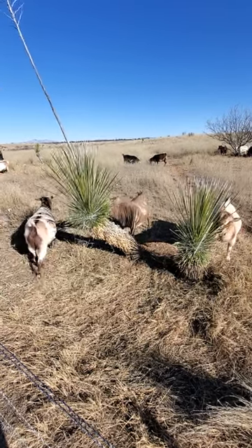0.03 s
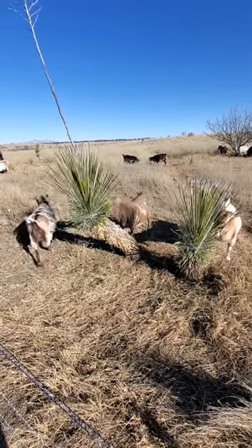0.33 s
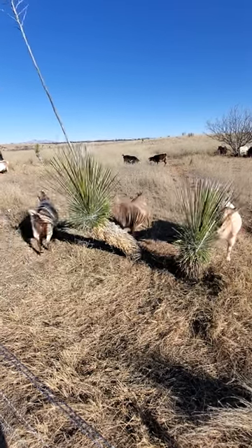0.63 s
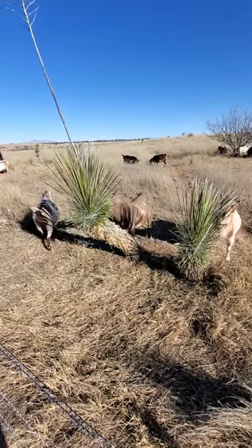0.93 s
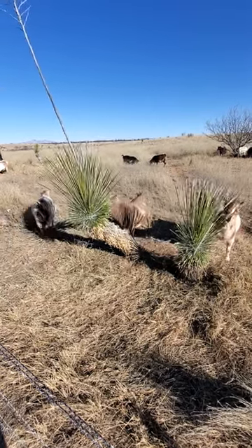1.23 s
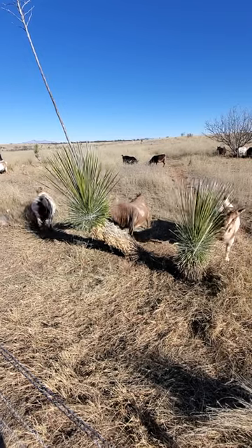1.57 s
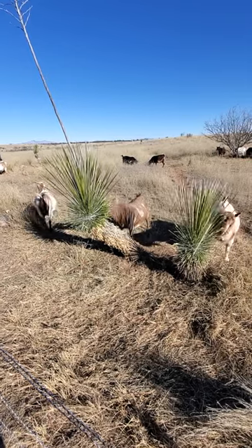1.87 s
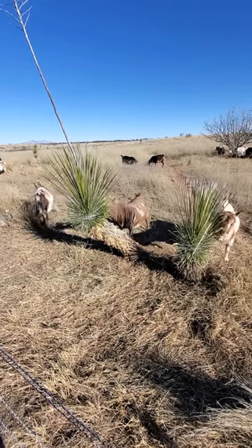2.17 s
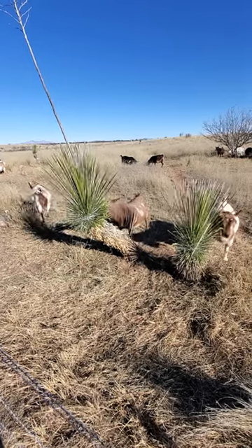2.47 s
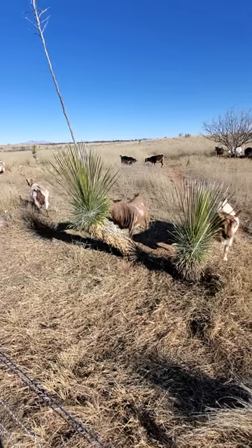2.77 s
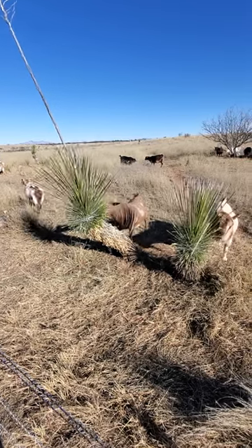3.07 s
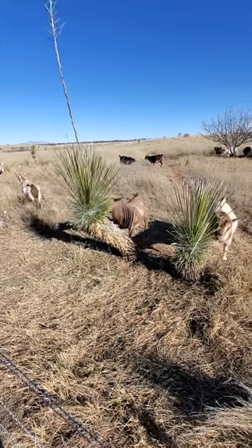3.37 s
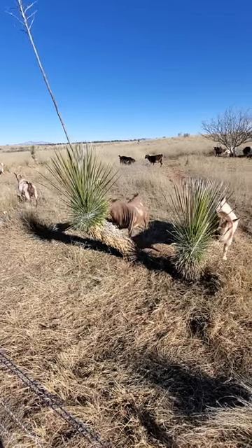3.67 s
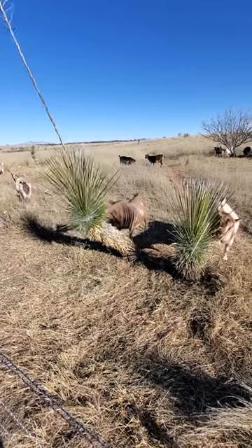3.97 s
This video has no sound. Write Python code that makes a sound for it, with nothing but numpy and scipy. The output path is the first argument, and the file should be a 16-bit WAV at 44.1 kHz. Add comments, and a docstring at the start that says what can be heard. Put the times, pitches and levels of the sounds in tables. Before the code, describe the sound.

Goats walk through dry grass, hooves crunching and stems snapping, busiest early and lighter afterwards. A distant bird rasps at the start, while wind buffets the microphone over a low open-air rumble.

```python
"""Goats walk through dry grassland: hooves crush the grass and knock on the earth, stems snap,
blades swish and a woody stalk ticks. Most of this is made of clicks and short bursts of noise.
A distant bird gives six rasping notes (a buzz shaped by its throat) and another whistles.
Wind buffets the two microphone ports (their openings) with gusts and thumps. Behind it all
are the rumble and hiss of open air and a low drone, probably a far engine."""
import sys
import numpy as np
from scipy import signal
from scipy.fft import rfft, irfft
from scipy.io import wavfile
from scipy.ndimage import uniform_filter1d

SR = 44100
rng = np.random.default_rng(int(sys.argv[2]) if len(sys.argv) > 2 else 0)


def dump_mix(stems):
    """Bounce the given channels to the path in sys.argv[1] as a 16-bit WAV at rate SR."""
    frames = np.atleast_2d(stems).T  # one column per channel
    limited = np.clip(frames, -1, 1)  # hard clip at full scale
    pcm = np.round(limited * 32767).astype(np.int16)
    wavfile.write(sys.argv[1], SR, pcm)


N = 176400
T = np.arange(N) / SR

# Tone of the open air: (frequency [Hz], relative level [dB])
AIR_SPECTRUM = [(25, -7), (45, 5.5), (70, 3.5), (105, 2), (135, -14.5), (205, -8), (270, -18.5),
                (390, -29.5), (580, -26), (850, -25.5), (1030, -30), (1220, -39.5), (1500, -44),
                (2200, -47), (5200, -53), (6800, -45.5), (8200, -58.5), (11000, -54), (14500, -44.5),
                (16000, -55)]
# Where the air sits; pan is left level minus right level: (frequency [Hz], pan [dB])
AIR_PAN = [(60, 4.5), (200, -2.5), (500, 5.5), (800, -3), (1400, 7), (2400, -2.5), (5000, 5.5),
           (8000, 10.5), (14000, -2.5)]
# How alike the air is in both ears: (frequency [Hz], likeness [0 to 1])
AIR_LIKENESS = [(40, 0.59), (130, 1), (290, 0.72), (640, 0.57), (1400, 0), (15000, 0.031)]
# Rise and fall of the far rumble: (time [s], level change [dB])
RUMBLE_CURVE = [(0.3, -2), (1.3, -0.5), (2.0, 1), (4, 0)]
# Tones of the drone: (pitch [Hz], level [dB])
DRONE_TONES = [(104, -45), (145.5, -53.5), (194, -59), (286, -73.5), (478, -87.5)]
# Rise and fall of the drone: (time [s], level change [dB])
DRONE_CURVE = [(0, 0.5), (0.8, -2.5), (1.3, 0.5), (2.1, -3), (2.6, -5), (3.0, -4.5), (4, -3)]

# Tone of the wind: (frequency [Hz], relative level [dB])
WIND_SPECTRUM = [(22, -24), (45, 6), (70, 5.5), (110, -6), (200, -19.5), (300, -28.5), (450, -43),
                 (900, -39.5)]
# Gusts on each port: (peak time [s], width [s], level [dB])
LEFT_PORT_GUSTS = [(0.045, 0.042, -33.5), (0.595, 0.038, -27.5), (1.65, 0.13, -39), (2.73, 0.025, -28.5),
                   (2.97, 0.2, -29.5), (3.195, 0.031, -29.5), (3.75, 0.36, -39.5)]
RIGHT_PORT_GUSTS = [(0.05, 0.0077, -28), (3.17, 0.045, -26.5), (3.325, 0.082, -34.5), (3.66, 0.015, -31.5),
                    (3.90, 0.081, -27.5)]
# Small whirls of air hit the ports: (time [s], width [s], peak level [dB], pan [dB])
WIND_THUMPS = [(1.438, 0.0027, -19, 18), (2.718, 0.0014, -22, 17), (2.876, 0.0015, -8.5, 46),
               (3.036, 0.0025, -27.5, 14), (3.077, 0.003, -19.5, 32), (3.16, 0.0021, -16.5, 20),
               (3.205, 0.0032, -17, 25), (3.867, 0.0014, -25, -20)]

# Whistles: (time [s], length [s], start pitch [Hz], middle pitch [Hz], end pitch [Hz], level [dB])
BIRD_WHISTLES = [(0.038, 0.024, 2040, 2106, 1770, -68), (0.047, 0.076, 2170, 2320, 2360, -71.5),
                 (0.304, 0.053, 2490, 2780, 3030, -64.5), (0.669, 0.045, 2610, 2765, 3100, -61.5),
                 (0.867, 0.035, 3180, 3230, 3060, -78), (1.667, 0.105, 2370, 2400, 2165, -69),
                 (2.048, 0.062, 3700, 3500, 3170, -74.5), (2.344, 0.044, 1940, 2740, 3050, -73)]
# Rasping notes: (middle time [s], half length [s], pitch [Hz], level [dB], throat tuning [ratio])
RASP_NOTES = [(0.302, 0.02, 413.5, -67, 0.97), (0.387, 0.016, 414, -59, 1.02),
              (0.466, 0.015, 417, -55.5, 1.05), (0.568, 0.019, 404.4, -53, 1.02),
              (0.663, 0.015, 405, -53, 1.037), (0.777, 0.016, 446.4, -61.5, 1.05)]
# How the bird's throat shapes its voice: (frequency [Hz], relative level [dB])
THROAT_SPECTRUM = [(800, -43), (1220, -10), (1400, -22), (1650, 5), (2000, -10.5), (2450, -5), (2850, -21),
                   (3200, -19), (3620, -1), (4020, -12), (4480, 3), (4800, -11), (5300, -15), (6400, -21),
                   (7500, -24)]

# Grass blades brush softly: (peak time [s], width [s], level [dB])
BLADE_SWISHES = [(0.10, 0.044, -65.5), (0.195, 0.043, -63.5), (1.55, 0.28, -79), (2.205, 0.025, -65.5),
                 (2.51, 0.0054, -70.5), (2.75, 0.13, -72.5), (3.06, 0.045, -72.5), (3.22, 0.1, -73),
                 (3.46, 0.026, -78)]
# Tone of a swish: (frequency [Hz], relative level [dB])
SWISH_SPECTRUM = [(1500, -43), (4000, 8), (6800, 15.5), (9000, 13), (12000, 15), (15000, 15)]
# Ringing tones of a woody stalk: (pitch [Hz], relative level [dB])
STALK_TONES = [(2150, -7), (2697, -1), (2982, -7.5)]
# Hooves hit the earth: (time [s], level [dB], pitch [Hz])
HOOF_KNOCKS = [(0.9235, -46.5, 765), (1.502, -61, 1000), (2.876, -53, 547), (3.105, -53.5, 590),
               (3.294, -71, 636), (3.328, -38.5, 213)]
# Dry stems break: (time [s], relative level [dB], fade time [s], pitch [Hz])
STEM_SNAPS = [(0.600, -59, 0.0022, 4850), (0.627, -54, .002, 11000), (0.777, -53, 0.0029, 11000),
              (0.851, -50.5, 0.0037, 11300), (0.910, -46, 0.0034, 13100), (0.9212, -37, 0.004, 3850),
              (0.966, -38, 0.0018, 11000), (0.9677, -35, 0.0046, 11600), (1.01, -60, 0.0019, 6000),
              (1.0495, -42, 0.003, 11000), (1.0762, -35, 0.0037, 11500), (1.080, -41, 0.0047, 4530),
              (1.1183, -36.5, 0.0027, 12200), (1.136, -48, .003, 7500), (1.1545, -40.5, 0.0014, 7500),
              (1.183, -41, 0.0051, 10000), (1.215, -40, 0.0017, 11000), (1.2378, -31.5, 0.0015, 13100),
              (1.258, -50, .001, 11000), (1.267, -45, .004, 9100), (1.302, -50, 0.012, 11000),
              (1.3195, -42.5, 0.0029, 10300), (1.504, -50, 0.0016, 6040), (1.5926, -36.5, 0.0017, 11200),
              (1.744, -47.5, 0.0014, 9000), (1.9445, -50, 0.00082, 12000), (1.9603, -50, 0.003, 6300),
              (2.643, -49.5, 0.004, 4620), (2.712, -59, 0.0043, 3300), (3.105, -55.5, 0.0023, 4000),
              (3.166, -55.5, 0.013, 5930), (3.878, -52, 0.0035, 6000)]
# Tone of crushed grass: (frequency [Hz], relative level [dB])
CRUSH_SPECTRUM = [(400, -14.5), (900, 2), (1600, -2.5), (2800, -3), (4800, -0.5), (7000, -3.5),
                  (9000, -3.5), (12000, -3), (16000, -4)]
# Hooves press the grass: (time [s], hold [s], level [dB], treble change [dB], pan [dB])
HOOF_STEPS = [(0.59, 0.022, -58, -31, 0), (0.782, 0.13, -65, -3.5, 4), (0.935, 0.021, -51.5, -4, 5.5),
              (0.972, 0.062, -56.5, 0, 4.5), (1.079, 0.082, -59.5, 1, 5), (1.15, 0.196, -65, 1.5, 4.5),
              (1.432, 0.21, -71, 2, 7.5), (1.647, 0.37, -84.5, 7, 16), (2.616, 0.11, -65.5, -14, 10),
              (2.86, 0.29, -84, 5, 12), (3.137, 0.15, -70.5, -1, 12), (3.292, 0.36, -78.5, 1.5, 12),
              (3.795, 0.156, -65.5, -4.5, 11)]

STEM_PAN_DB = 3


def from_db(db):
    """Turn decibels into a number to multiply a sound by."""
    return 10 ** (np.asarray(db) / 20)


def rms_one(x):
    """Scale a signal so that its average power is 1."""
    return x / np.sqrt(np.mean(x ** 2) + 1e-20)


def at_hz(points, hz):
    """Read between the rows of a table, with octaves evenly spaced."""
    freqs, values = np.transpose(points)
    return np.interp(np.log(hz), np.log(freqs), values)


def pan(db):
    """Left and right gains; positive decibels move the sound left."""
    return from_db(np.array([[db], [-db]]) / 2)


def drift(rate_hz):
    """A smooth random wobble of about size 1; a higher rate wobbles faster."""
    pole = np.exp(-80 * np.pi * rate_hz / SR)
    slow = signal.lfilter([1], [1, -2 * pole, pole * pole], rng.standard_normal(N // 40 + 2002))[2000:]
    return np.interp(np.arange(N) / 40, np.arange(len(slow)), rms_one(slow))


def band(x, low_hz, high_hz, order=2):
    """Keep the sound between two frequencies."""
    edges = [low_hz, min(high_hz, SR / 2 - 1000)]
    return signal.sosfilt(signal.butter(order, edges, "band", fs=SR, output="sos"), x + 1e-18)


def colour(x, spectrum):
    """Give a sound the tone in a table; white noise keeps its power."""
    hz = np.maximum(np.arange(N // 2 + 1) * SR / N, 1)
    gain = rms_one(from_db(at_hz(spectrum, hz)))
    # Make the filter ring only after a click, never before it.
    cepstrum = irfft(np.log(gain), N)
    cepstrum[1:N // 2] *= 2
    cepstrum[N // 2 + 1:] = 0
    response = irfft(np.exp(rfft(cepstrum)), N)[:SR // 10]
    return signal.fftconvolve(x, response[None], axes=1)[:, :N]


def white():
    """Plain hiss, separate for left and right."""
    return rng.standard_normal((2, N))


def swells(rows):
    """A loudness curve made of smooth bumps."""
    bumps = (from_db(db) * np.exp(-.5 * ((T - s) / width) ** 2) for s, width, db in rows)
    return np.sqrt(sum(bump ** 2 for bump in bumps))


def decay(start, fade_s):
    """A loudness curve that starts suddenly and dies away."""
    return (T >= start) * np.exp(-np.minimum(np.abs(T - start) / fade_s, 50))


def air():
    """A slowly swelling far rumble and fine hiss, alike in both ears only in the low range."""
    hz = np.maximum(np.arange(N // 2 + 1) * SR / N, 1)
    sides = np.array([[1], [-1]])
    alike = np.clip(at_hz(AIR_LIKENESS, hz), -1, 1)
    shared, opposed = rfft(white())
    blend = np.sqrt(1 + alike) * shared + np.sqrt(1 - alike) * opposed * sides
    noise = irfft(blend * from_db(sides * at_hz(AIR_PAN, hz) / 2), N)
    flickering_db = -43.5 + 2 * drift(15)
    noise = from_db(flickering_db) * rms_one(colour(noise, AIR_SPECTRUM))
    rumble = signal.sosfiltfilt(signal.butter(2, [160, 1200], "band", fs=SR, output="sos"), noise)
    return noise - rumble + rumble * from_db(np.interp(T, *np.transpose(RUMBLE_CURVE)))


def drone():
    """A low hum, probably a far engine; each tone wavers in pitch and loudness."""
    curve_db = np.interp(T, *np.transpose(DRONE_CURVE))
    out = 0
    for hz, db in DRONE_TONES:
        gain = from_db(db + curve_db + 3.5 * drift(10.5))
        pitch = hz * (1 + .01968 * drift(7.95))
        out += gain * np.sqrt(2) * np.sin(2 * np.pi * np.cumsum(pitch) / SR)
    return out


def wind():
    """Each port gets its own gusts; single whirls of air thump, mostly on one port."""
    churn = colour(white(), WIND_SPECTRUM)
    churn /= np.sqrt(uniform_filter1d(churn ** 2, size=SR // 16, axis=1))  # even out the loudness
    out = band(churn, 3, 800, order=4) * [swells(LEFT_PORT_GUSTS), swells(RIGHT_PORT_GUSTS)]
    for s, width, db, pan_db in WIND_THUMPS:
        push = (1 + ((T - s) / width) ** 2 / 4) ** -2.5
        thump = band(push, low_hz=53.3, high_hz=390, order=3)
        out += from_db(db) * thump / np.abs(thump).max() * pan(pan_db) / pan(pan_db).max()
    return out


def far_off(call, scatter_db):
    """A distant call reaches the left port first, and the scrub scatters it into a short echo."""
    lag_s, fade_s = .0002, .051
    tail = white()[:, :SR // 2] * np.exp(-T[:SR // 2] / fade_s)
    tail /= np.sqrt(np.sum(tail ** 2, axis=1, keepdims=True))
    direct = np.array([call, np.interp(T - lag_s, T, call)])
    return direct + from_db(scatter_db) * signal.fftconvolve(call[None], tail, axes=1)[:, :N]


def whistling_bird():
    """Thin, fluttering whistles: each is one tone sliding through three pitches."""
    out = np.zeros(N)
    waver = 1 + .01 * drift(120)
    for s, length, start_hz, middle_hz, end_hz, db in BIRD_WHISTLES:
        now = (T > s) & (T < s + length)
        progress = (T[now] - s) / length
        slide = np.polyfit([0, .5, 1], [start_hz, middle_hz, end_hz], 2)
        pitch = np.polyval(slide, progress) * waver[now]
        envelope = from_db(db) * np.sqrt(2) * np.sin(np.pi * progress)
        out[now] += envelope * np.sin(2 * np.pi * np.cumsum(pitch) / SR)
    return out * from_db(2.5 * drift(81))


def rasping_bird():
    """Short harsh notes: shaky overtones, shaped by the throat, rise and fall in pitch together."""
    voice, rasp = np.zeros((2, N + SR))
    size = SR // 5
    t = (np.arange(size) - size / 2) / SR
    overtones = np.arange(2, 19)[:, None]
    jitter = 1 + .007 * drift(204)
    shimmer = from_db(2.5 * np.array([drift(150) for _ in overtones]))
    for s, half, hz, db, tuning in RASP_NOTES:
        start = int(s * SR) - size // 2
        now = slice(start, start + size)
        from_middle = np.clip(t / half, -2, 2)
        arch = 1 - .024 * from_middle ** 2 - .014 * from_middle  # ends lower than it starts
        phase = 2 * np.pi * np.cumsum(hz * arch * jitter[now]) / SR
        strengths = from_db(at_hz(THROAT_SPECTRUM, overtones * hz / tuning)) * shimmer[:, now]
        buzz = rms_one((strengths * np.sin(overtones * phase)).sum(axis=0))
        envelope = from_db(db) * np.exp(-.7 * np.abs(t / half) ** 2.5)
        voice[now] += buzz * envelope
        rasp[now] += envelope * (1 + np.cos(phase))  # hiss pulses in time with the buzz
    return voice[:N] + from_db(-9) * rasp[:N] * colour(white(), THROAT_SPECTRUM)[0]


def swishes():
    """Grass blades brush past in soft swells of bright hiss."""
    return swells(BLADE_SWISHES) * colour(white(), SWISH_SPECTRUM) * pan(db=5)


def stalk(time_s=3.535, level_db=-62):
    """A woody stalk is struck once and rings with a tiny tick."""
    ring = sum(from_db(level_db + db) * np.sin(2 * np.pi * hz * (T - time_s)) for hz, db in STALK_TONES)
    return decay(time_s, fade_s=.0043) * ring * pan(STEM_PAN_DB)


def knocks():
    """A hoof hits the earth with a short, dull burst of noise."""
    noise, out = white(), 0
    for s, db, hz in HOOF_KNOCKS:
        envelope = decay(s, fade_s=.007)
        thud = band((noise[0] + .5 * noise) * envelope, hz * .6, hz * 1.5, order=3)
        out += from_db(db) * rms_one(thud) * np.sqrt(np.mean(envelope ** 2))
    return out


def snaps():
    """A dry stem breaks in a ragged burst of a few milliseconds."""
    out, size = np.zeros((2, N + SR)), SR // 10
    spread, rough_db = 2 ** .53, 1.5  # about half an octave to each side of the pitch
    for s, db, fade_s, hz in STEM_SNAPS:
        fibres = rms_one(rng.standard_normal((2, size)) * from_db(rough_db * rng.standard_normal(size)))
        envelope = np.exp(-T[:size] / fade_s)
        crack = rms_one(band(fibres * envelope, hz / spread, hz * spread, order=1))
        start = int(s * SR)
        out[:, start:start + size] += from_db(db) * crack * np.sqrt(np.mean(envelope ** 2)) / 2
    return out[:, :N] * pan(STEM_PAN_DB)


def steps():
    """Each hoof crushes many grass fibres: dense clicks that build, hold and die away."""
    clicks_per_s, treble_hz, release_s = 2400, 7000, .03
    sizes = from_db(3.7 * np.minimum(rng.exponential(1, N), 4.5))  # many small, a few big
    clicks = rms_one((rng.random(N) < clicks_per_s / SR) * sizes * white())
    crackle = rms_one(colour(clicks + from_db(-1) * white(), CRUSH_SPECTRUM))
    crackle *= from_db(2 * drift(49))  # the level flutters
    body = signal.sosfiltfilt(signal.butter(2, treble_hz, fs=SR, output="sos"), crackle)
    body_power = treble_power = 0
    for s, hold, db, treble_db, pan_db in HOOF_STEPS:
        rise = np.clip((T - s) / (.76 * hold) + .5, 0, 1)
        fall = np.exp(-np.maximum(T - s - hold, 0) / release_s)
        gain = from_db(db) * pan(pan_db) * rise * fall
        body_power += gain ** 2
        treble_power += (gain * from_db(treble_db)) ** 2
    return np.sqrt(body_power) * body + np.sqrt(treble_power) * (crackle - body)


def scene():
    """Add up the goats, birds, drone, air and wind."""
    goats = steps() + snaps() + knocks() + stalk() + swishes()
    rasps = far_off(rasping_bird(), scatter_db=-11) * pan(db=1.5)
    whistles = far_off(whistling_bird(), scatter_db=-7) * pan(db=-7.5)
    return goats + rasps + whistles + drone() + air() + wind()


def record(dry):
    """Cut the deepest bass (below 24 Hz) and the highest treble (above 16200 Hz)."""
    dry = signal.sosfilt(signal.butter(2, 24, "high", fs=SR, output="sos"), dry)
    return signal.sosfilt(signal.ellip(10, .1, 80, 16200, fs=SR, output="sos"), dry)


dry = scene()
out = record(dry)
dump_mix(out)
```